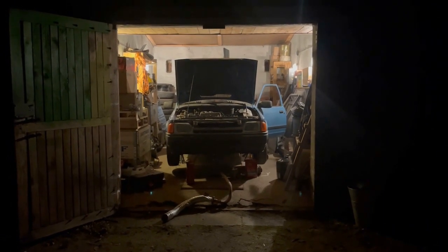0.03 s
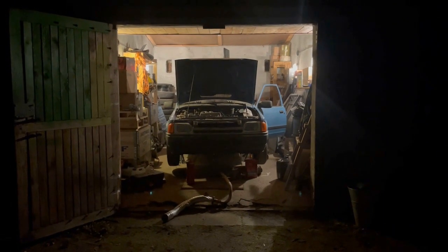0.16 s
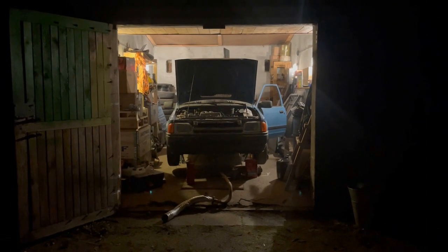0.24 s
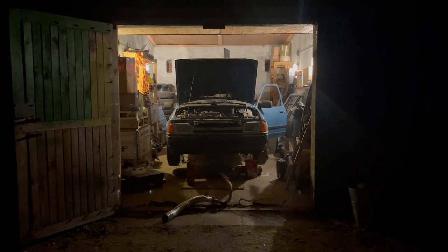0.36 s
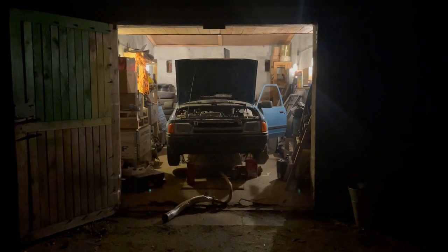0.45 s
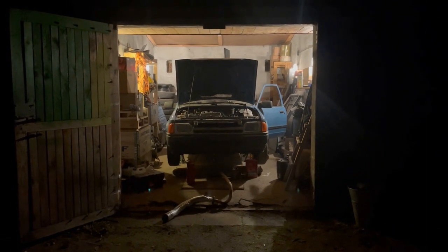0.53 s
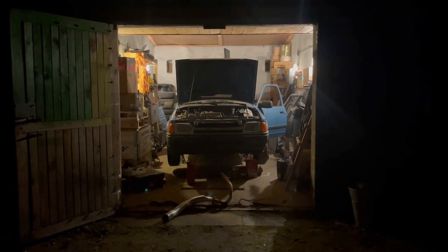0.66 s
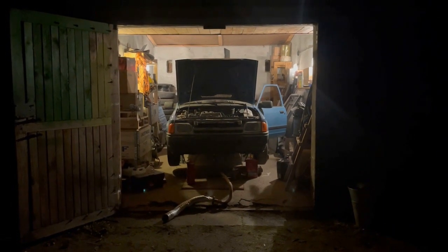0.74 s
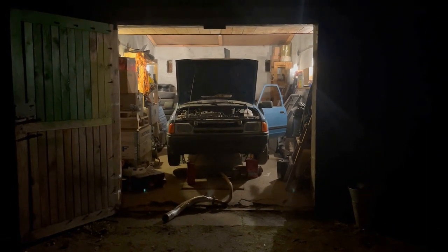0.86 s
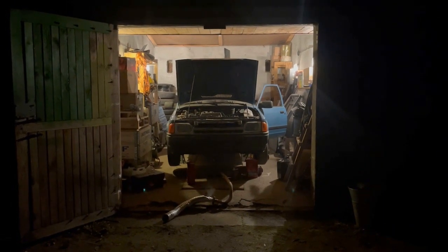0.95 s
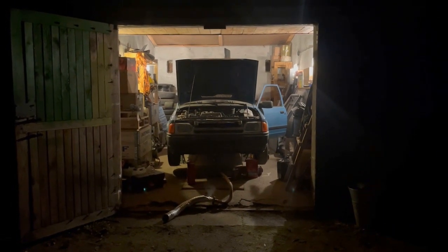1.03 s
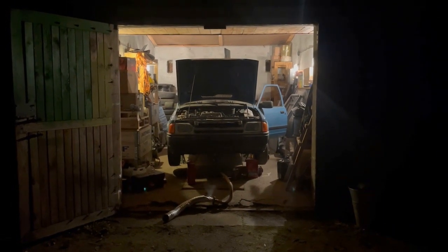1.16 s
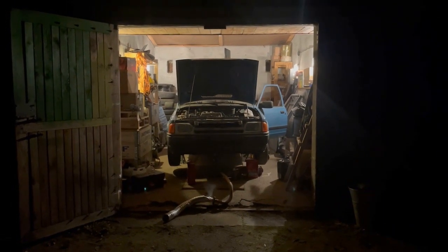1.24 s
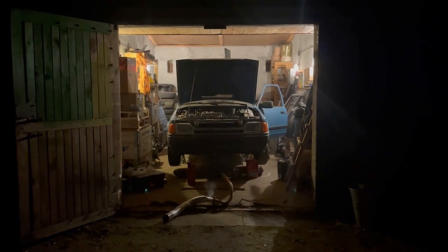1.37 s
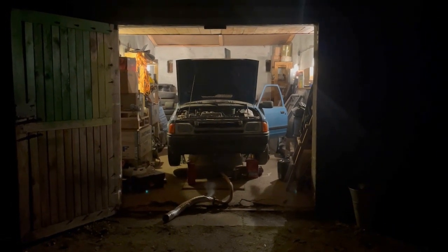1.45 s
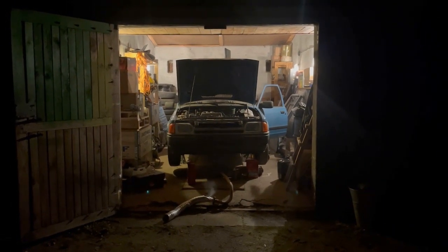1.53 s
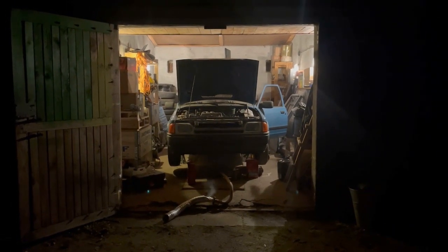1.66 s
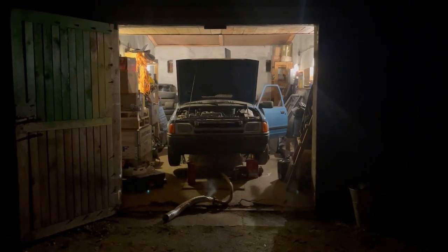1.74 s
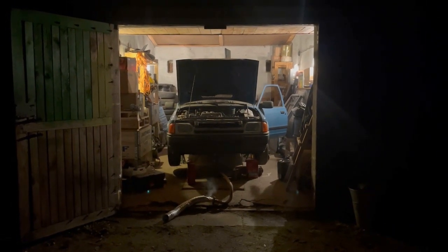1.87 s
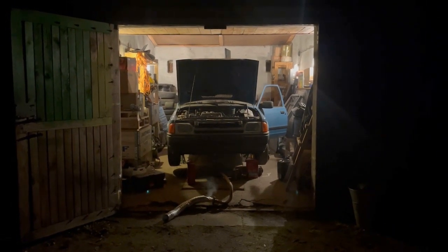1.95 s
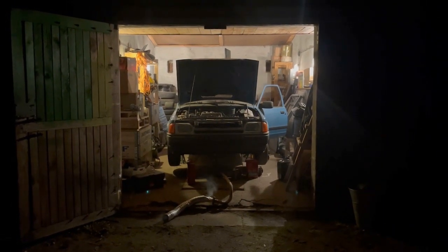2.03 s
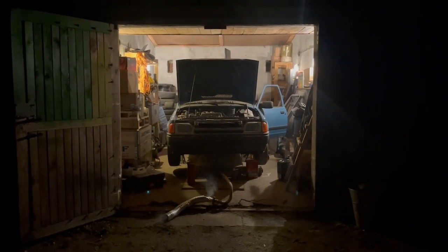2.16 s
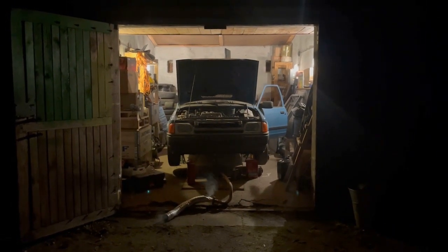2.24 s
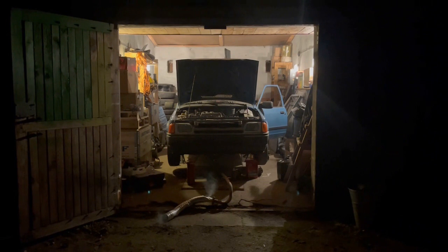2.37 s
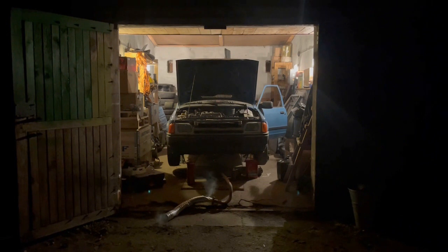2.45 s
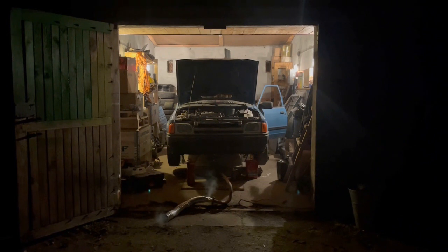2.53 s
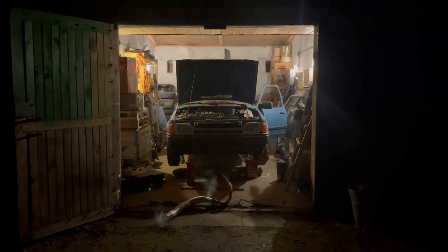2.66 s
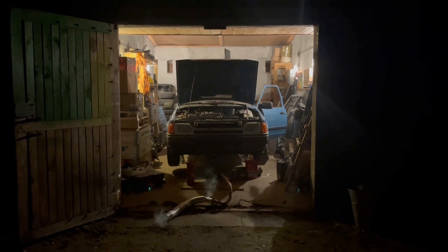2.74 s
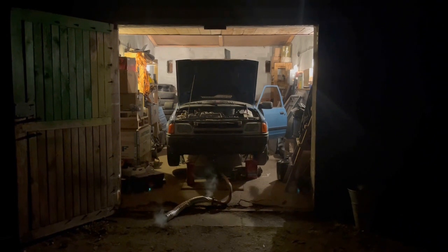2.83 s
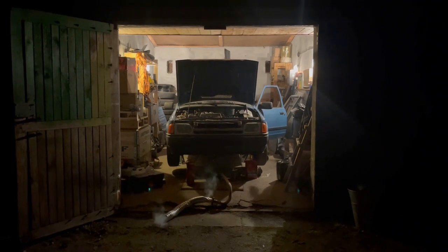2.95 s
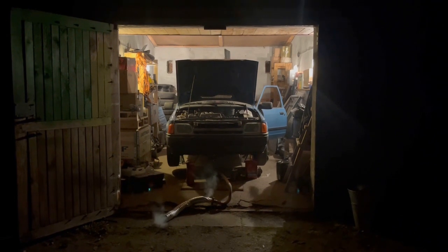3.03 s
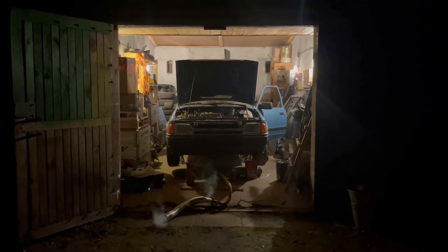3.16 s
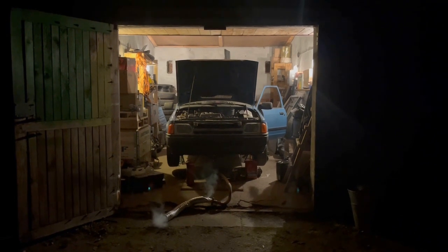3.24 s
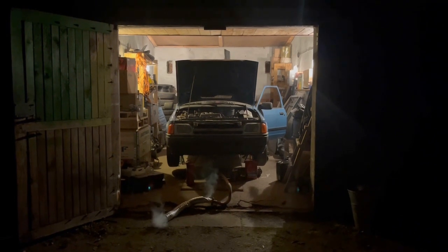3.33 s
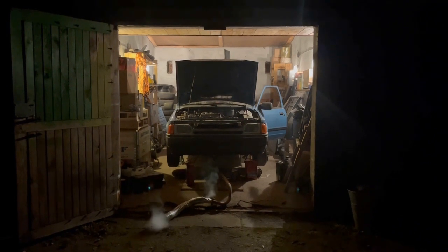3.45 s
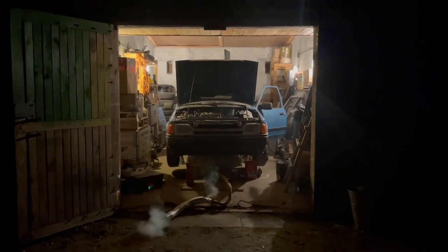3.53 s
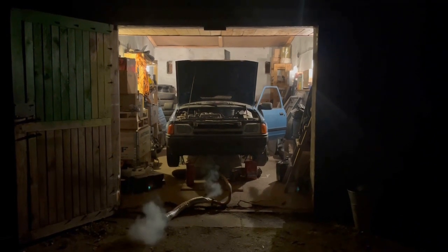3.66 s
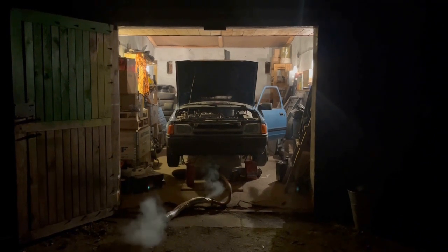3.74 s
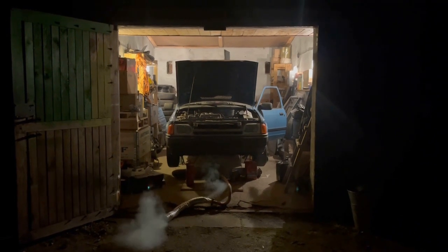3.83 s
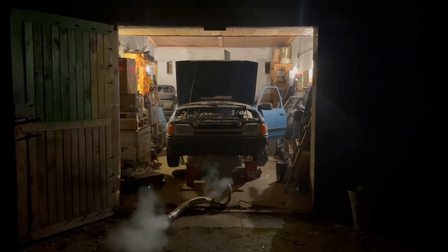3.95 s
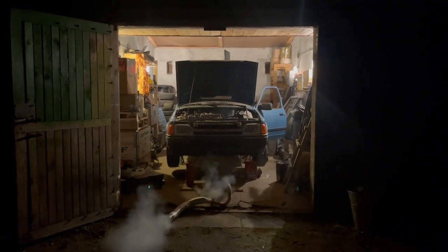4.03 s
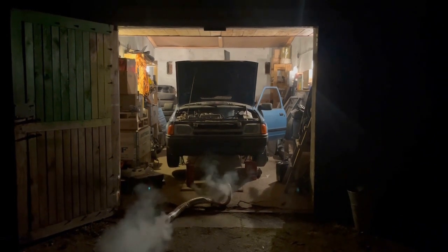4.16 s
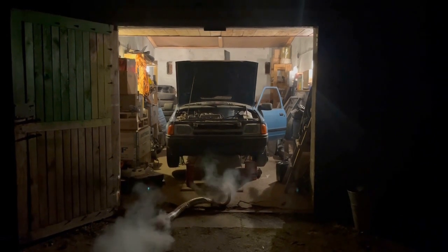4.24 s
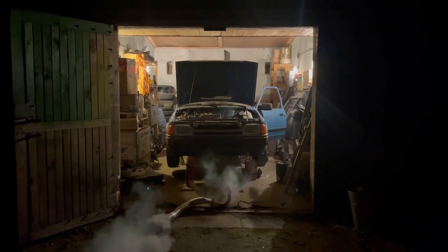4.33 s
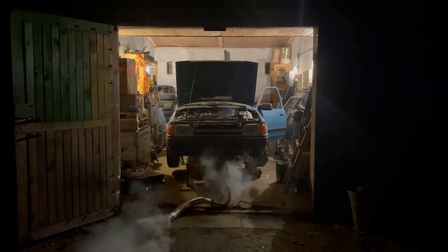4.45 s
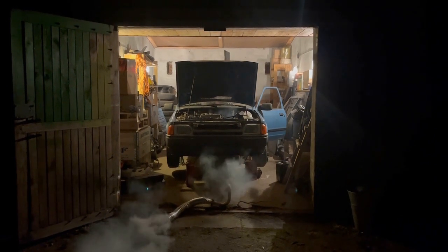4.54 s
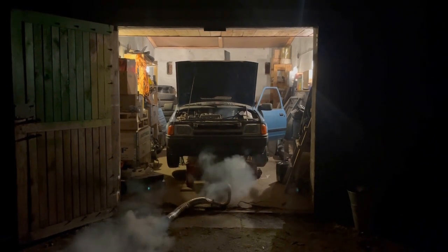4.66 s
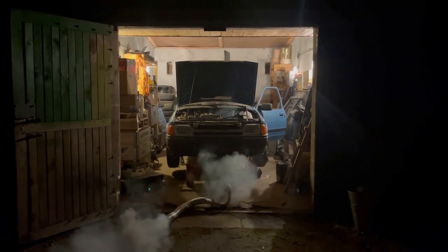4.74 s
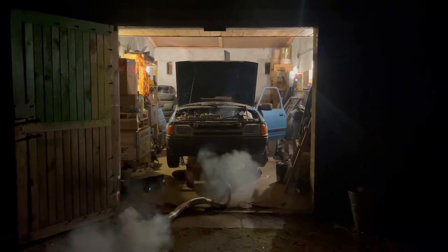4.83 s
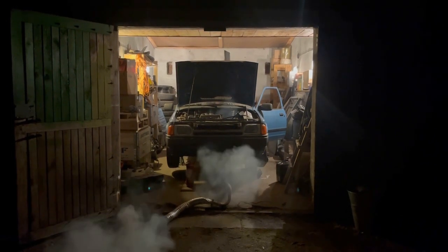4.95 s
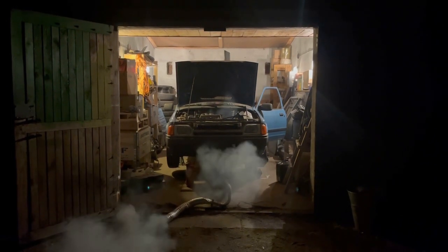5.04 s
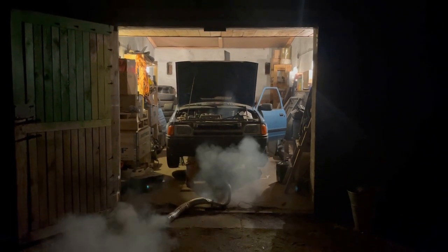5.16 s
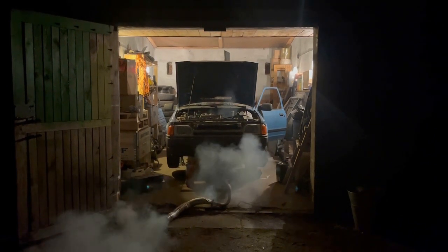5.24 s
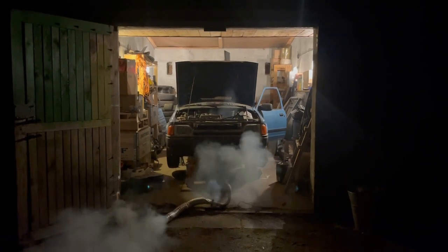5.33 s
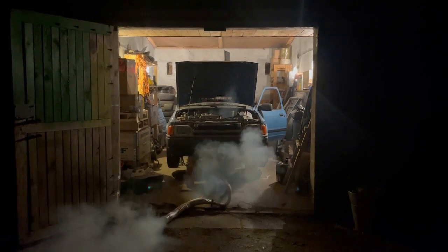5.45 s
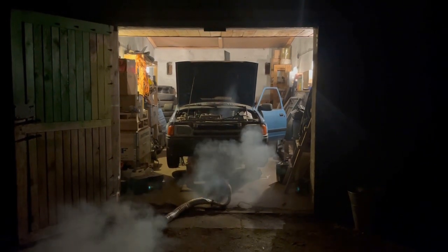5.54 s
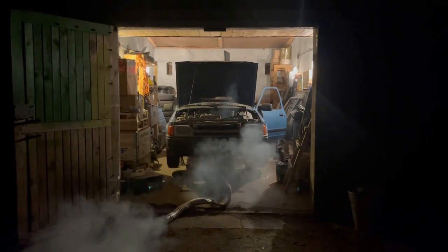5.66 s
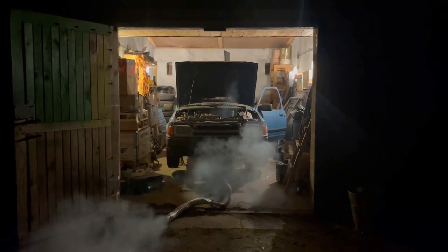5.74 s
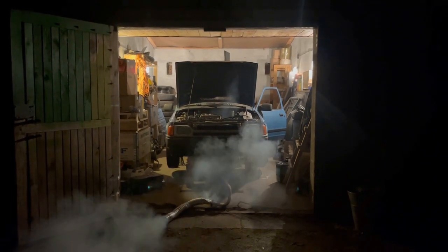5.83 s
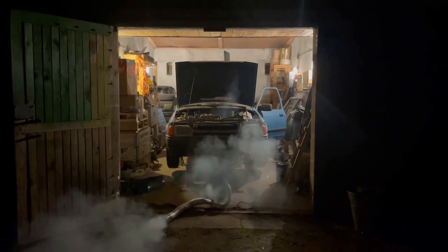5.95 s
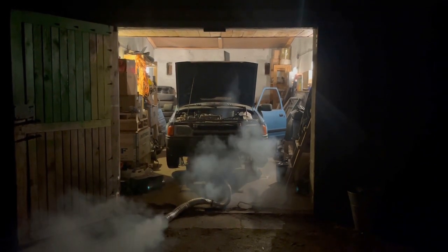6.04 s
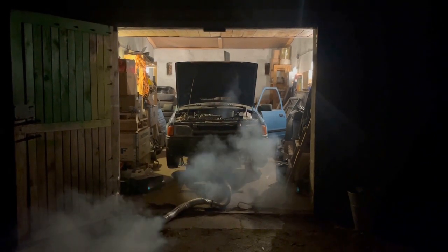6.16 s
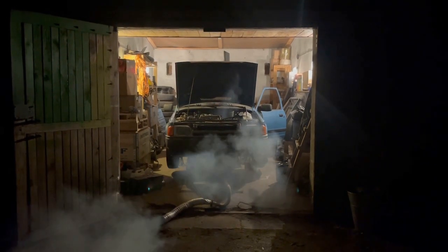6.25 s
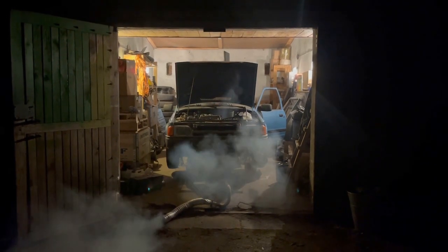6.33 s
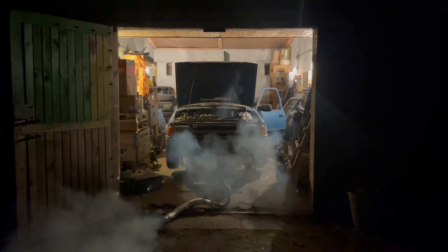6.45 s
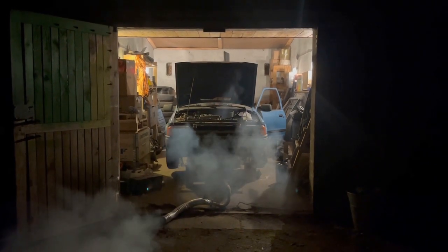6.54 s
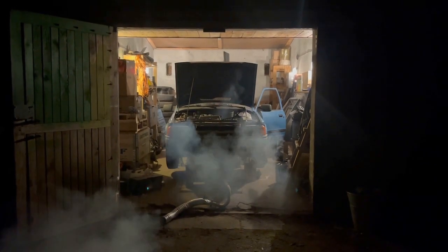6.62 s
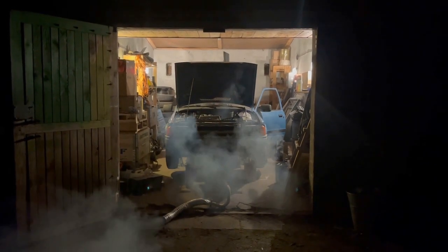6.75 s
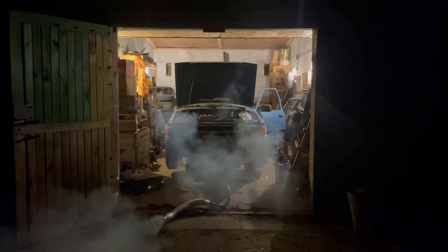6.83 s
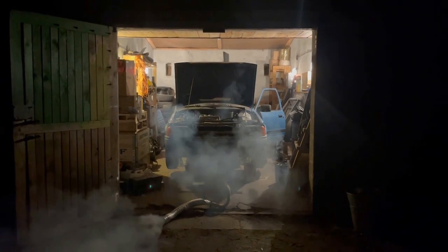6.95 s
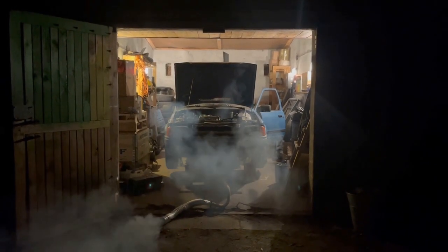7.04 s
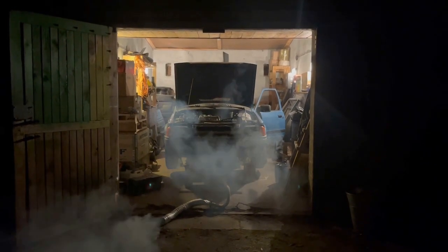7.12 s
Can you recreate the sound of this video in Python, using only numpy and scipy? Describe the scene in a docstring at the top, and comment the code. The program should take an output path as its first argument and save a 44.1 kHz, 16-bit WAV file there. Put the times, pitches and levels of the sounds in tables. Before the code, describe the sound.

A starter grinds a diesel engine over until it catches, then the engine runs roughly in knocking surges inside a garage.

```python
"""A diesel engine starts in a garage

A long-idle four-cylinder diesel is heard from outside the open door. The starter's gears grind
through twenty compression strokes, each a piston squeezing air. Then the engine catches and races.
Its governor, which controls the fuel, keeps overshooting: bursts of hard knocking from burning
fuel alternate with soft coasts in which the exhaust pipe booms."""
import sys
import numpy as np
from scipy import signal
from scipy.fft import rfft, irfft, next_fast_len
from scipy.io import wavfile
from scipy.ndimage import uniform_filter1d, minimum_filter1d

SR = 44100
rng = np.random.default_rng(int(sys.argv[2]) if len(sys.argv) > 2 else 0)


def waveform_to_disk(signal):
    """Save audio, clipped to [-1, 1], as 16-bit WAV at the path in sys.argv[1]."""
    frames = np.transpose(np.atleast_2d(signal))
    scaled = np.clip(frames, -1, 1) * 32767
    samples = np.round(scaled).astype(np.int16)
    wavfile.write(sys.argv[1], SR, samples)


N = 317079
TIME = np.arange(N) / SR

# Surges of fuel let in by the governor, and how strongly they burn:
# (start [s], length [s], level just before [dB], level on opening [dB], level on shutting [dB])
SURGES = [(4.543, 0.34, -33.5, -16.5, -19), (5.228, .22, -39, -19.5, -22), (5.756, 0.18, -48.5, -19, -27.5),
          (6.063, .19, -30, -21, -21), (6.62, 0.17, -36.5, -18.5, -22.5)]


def amp(db):
    """Turns decibels into a factor to multiply by."""
    return 10 ** (np.asarray(db) / 20)


def unit(x):
    """Scales a signal to an average (rms) size of one."""
    return x / np.sqrt(np.mean(x ** 2) + 1e-20)


def curves(table, at=TIME):
    """Joins a table's rows with straight lines: one curve for each column after the first."""
    key, *columns = np.transpose(table)
    return [np.interp(at, key, column) for column in columns]


def spectrum(table, hz):
    """Like curves, but along frequency, with every octave equally wide."""
    key, *columns = np.transpose(table)
    return [np.interp(np.log(hz + 1), np.log(key + 1), column) for column in columns]


def convolve(x, response):
    """Lets every sample of x set off its own copy of a response."""
    return signal.oaconvolve(x, response)[:N]


def colour(x, points, size=4096):
    """Shapes the tone by (frequency [Hz], relative level [dB]) points; white noise keeps its power."""
    hz = abs(np.fft.fftfreq(size, 1 / SR))
    log_gain = np.log(amp(np.maximum(spectrum(points, hz)[0], -100)))
    response = np.exp(np.conj(signal.hilbert(log_gain)))  # nothing sounds ahead of its cause
    taps = np.fft.ifft(response).real[:size // 2]
    return convolve(x, taps / np.linalg.norm(taps))


def resonate(x, hz, width):
    """A resonance: passes a band around one frequency and weakens the rest."""
    return signal.lfilter(*signal.iirpeak(hz, hz / width, SR), x)


def noise():
    """White noise, an even hiss."""
    return rng.standard_normal(N)


def noise_band(hz, width):
    """Noise gathered around one frequency."""
    return unit(resonate(resonate(noise(), hz, width), hz, width))


def waver(per_s):
    """A smooth random wobble, up to about per_s times a second."""
    return unit(irfft(rfft(noise()) * np.exp(-(np.fft.rfftfreq(N, 1 / SR) / per_s) ** 2), N))


def ring(modes, detune=0., size=8192):
    """The fading tones of something struck; detune shifts each pitch at random."""
    t = np.arange(size) / SR
    tones = np.zeros(size)
    for hz, fade_s, db in modes:
        pitch = hz * (1 + detune * rng.standard_normal())
        tones += amp(db - 60 * t / fade_s) * np.sin(2 * np.pi * pitch * t)
    return tones


def garage(x, wet_db, size=20000):
    """The direct sound plus wall echoes at a level of wet_db, reaching two close microphone openings."""
    # How long the echoes last: (frequency [Hz], time to fade by 60 dB [s])
    echo_times = [(100, 0.54), (500, 0.23), (2000, 0.28), (6000, 0.36), (15000, 0.21)]
    # The two openings: (frequency [Hz], likeness of their echoes [0-1], left minus right [dB])
    openings = [(91, 0.71, 6.5), (302, 0.9, -1), (664, 0, 4.5), (1260, 0, 6), (2360, 0, 1), (3930, 0, 5.5),
                (8400, 0, 0), (15000, 0.8, 0)]
    hz, t, bands = signal.stft(rng.standard_normal((2, size)), SR, nperseg=256)
    fade = amp(-60 * t / spectrum(echo_times, hz)[0][:, None])
    echoes = signal.istft(bands * fade, SR, nperseg=256)[1]
    echoes *= np.minimum(np.arange(echoes.shape[1]) / SR / .004, 1)
    echoes *= amp(wet_db) / np.linalg.norm(echoes, axis=1, keepdims=True)
    length = next_fast_len(N + size)
    hz = np.fft.rfftfreq(length, 1 / SR)
    same, balance_db = spectrum(openings, hz)
    shared, apart = rfft(echoes, length) * np.sqrt([(1 + same) / 2, (1 - same) / 2])
    lead = np.exp(2j * np.pi * hz * 9e-6)  # the sound reaches the left opening first
    left = (lead + shared + apart) * amp(balance_db / 2)
    right = (1 / lead + shared - apart) * amp(-balance_db / 2)
    stereo = irfft(np.array([left, right]) * rfft(x, length), length)[:, :N]
    return stereo / np.sqrt(1 + amp(wet_db) ** 2)


def strokes(count=28):
    """Counts the compression strokes the starter has pushed through, and gives each one's effort in dB."""
    # The four cylinders while the starter turns them: (lateness [s], effort [dB])
    compression = [(.004, -3.5), (-.002, -3), (-.001, -3.5), (-0.0051, -2.8)]
    first_s, stroke_s, loosen_s = .0145, .17285, .000192  # strokes shorten as the oil loosens
    k = np.arange(-1, count)
    late_s, effort_db = np.array(compression)[k % len(compression)].T
    starts = first_s + k * (stroke_s - k * loosen_s / 2) + late_s
    stroke = np.interp(TIME, starts, k + 1)
    return stroke, effort_db[stroke.astype(int)]


def starter():
    """A small gear grinds on the engine's big one, slows at each squeeze and whines back up to speed."""
    # One stroke: (position [0-1], tooth rate [Hz], load on the teeth [dB], scrape [dB], whine [dB])
    one_stroke = [(0, 405.8, -9, -1, -13), (.04, 398.6, -1.5, -4, 6), (.16, 384.7, -2, -5, -8),
                  (.33, 301.9, -1.5, -37, 0), (.42, 285, -2.5, -32, -27), (.54, 314.5, -8.5, -10, 3),
                  (.7, 343.2, -12, -9, 0), (.84, 381.3, -18.5, -12, -2), (.97, 404.1, -13, -5, 6.5),
                  (1, 405.7, -16, 11, -18)]
    # How hard the starter drives the engine: (time [s], level [dB])
    drive = [(0, 3.5), (3.4, 3.5), (3.55, -5), (3.7, 0.5), (4.1, -58)]
    # Ringing of the metal housing around the gears: (frequency [Hz], width [Hz], level [dB])
    housing_tones = [(289, 71, 5.5), (427, 33, 1), (535.3, 24, 6.5), (858, 22, 4), (1100, 82, -23),
                     (1192, 48, -4), (1270, 23, -37), (1993, 46, -12)]
    # Tone of the grinding: (frequency [Hz], level [dB])
    grind_tone = [(60, -75), (110, -17.5), (175, -4), (220, -22), (330, -2), (470, -18), (700, -9),
                  (1250, -5.5), (1600, -9.5), (2300, -10.5), (3000, -17.5), (4500, -26), (8000, -34),
                  (15000, -41)]
    # Tone of the scraping: (frequency [Hz], level [dB])
    scrape_tone = [(1500, -7), (3000, -48), (5000, 22), (6200, 18.5), (7500, 6), (11000, 14), (14000, -9),
                   (16000, -68)]
    whine_cycles_per_tooth = 7.8
    stroke, effort_db = strokes()
    tooth_hz, load_db, scrape_db, whine_db = curves(one_stroke, stroke % 1)
    effort = amp(effort_db + curves(drive)[0])
    teeth = np.cumsum(tooth_hz * (1 + .008 * waver(12) + .004 * waver(150))) / SR
    impacts = unit((2 + np.exp(-(teeth % 1) / .81)) * noise() * amp(2 * waver(180)))  # one blow a tooth
    buzz = unit(sum(np.cos(2 * np.pi * k * teeth) * (1 + waver(72)) for k in range(1, 8)))
    pressed = effort * amp(1.53 * load_db) * (buzz + 1.6 * impacts)  # the housing rings under load
    housing = amp(-26.5) * sum(amp(db) * resonate(pressed, hz, width) for hz, width, db in housing_tones)
    squeeze = amp(1.5 - 10 * (stroke % 1))  # the scrape starts sharply with each stroke
    grind = amp(-32.5) * colour(effort * amp(load_db) * impacts, grind_tone)
    scrape = amp(-44.5) * colour(effort * amp(scrape_db) * squeeze * noise(), scrape_tone)
    flutter = amp(2.4 * waver(70))
    motor_tone = np.sin(2 * np.pi * whine_cycles_per_tooth * teeth + .8 * waver(300))
    whine = effort * amp(-49 + whine_db) * flutter * motor_tone
    pipe_air = unit(resonate(resonate(noise(), 66.5, 22), 62, 36))  # unburnt air in the exhaust
    puffs = pipe_air * effort * amp(-40 + .71 * load_db)
    return garage(housing + grind + scrape, wet_db=-5) + garage(whine, wet_db=-10) + puffs


def overrun():
    """A thin, flickering hiss as the engine catches, probably the starter being dragged along."""
    # Swell of the hiss: (time [s], level [dB])
    swell = [(3.38, -100), (3.45, -55), (3.7, -47), (3.95, -50), (4.12, -60), (4.25, -100)]
    level = amp(curves(swell)[0] + 2 * waver(60))
    return garage(level * noise_band(hz=12300, width=13000), wet_db=-11)


def crankshaft():
    """The turning main shaft sets the firings per second and the count of firings so far."""
    # Engine speed, a run-up and then five swings: (time [s], firing rate [Hz])
    speed = [(3.41, 14), (3.57, 17.1), (3.72, 21), (3.86, 29.9), (3.98, 41.1), (4.08, 57.1), (4.19, 67.2),
             (4.543, 42.5), (4.89, 75.6), (5.228, 55.8), (5.51, 74.1), (5.756, 51.9), (5.91, 64.9),
             (6.063, 69), (6.26, 86.3), (6.6, 72.5), (6.785, 106), (7.19, 66)]
    rate = np.interp(TIME, *np.transpose(speed), left=0)
    fired = np.cumsum(rate) / SR
    for start, *_ in SURGES:  # nudge the count so that each surge begins on a firing
        so_far = np.interp(start, TIME, fired)
        fired += (np.round(so_far) - so_far) * np.interp(TIME, [start - .12, start], [0, 1])
    return rate, fired


def combustion():
    """How strongly the fuel burns, in dB: the engine catches, then surges and coasts by turns."""
    # Burning as the engine catches and runs up: (time [s], level [dB])
    catch = [(3.41, -23), (3.6, -18), (3.655, -14), (3.85, -13.5), (4.15, -18.5)]
    lead_in_s, open_s, shut_s = .033, .0044, .02  # fuel comes on around a surge's start and is cut fast
    coast_db, final_db = -36, -50.5
    points = list(catch) + [(catch[-1][0] + shut_s, coast_db)]
    for start, length, before_db, first_db, last_db in SURGES:
        points += [(start - lead_in_s, before_db), (start + open_s, first_db)]
        points += [(start + length, last_db), (start + length + shut_s, coast_db)]
    return curves(points + [(N / SR, final_db)])[0]


def firings(rate, fired):
    """Each firing cracks against the engine block, and a puff rings the exhaust just after it."""
    # Single firings that stand out: (time [s], strength of burning [dB])
    lone_knocks = [(3.539, -15.5), (3.999, -11), (4.095, -16), (4.352, -30), (4.419, -31), (4.565, -13.5),
                   (4.588, -15.5), (4.609, -17), (4.649, -14), (4.783, -21.5), (5.187, -26.5), (5.227, -18),
                   (5.281, -15.5), (5.377, -14), (5.421, -12.5), (5.776, -19), (6.035, -25.5),
                   (6.063, -18.5), (6.133, -18)]
    # The four unequal cylinders, in firing order: (level [dB])
    cylinders = [0.68, -1.4, 0.088, -1.2]
    # Tone of the crack: (frequency [Hz], level [dB])
    crack_tone = [(140, -19.5), (230, -18.5), (357, 0.5), (526, -16.5), (803, -7.5), (909, -17),
                  (1070, -10.5), (1570, -24), (1940, -14.5), (3120, -22.5), (6090, -30), (8370, -41.5),
                  (9460, -35.5), (11700, -39), (15500, -55.5)]
    # Ringing of the engine block: (frequency [Hz], time to fade by 60 dB [s], level [dB])
    block_tones = [(355, 0.019, 9.5), (365, 0.012, -10), (780, 0.048, -3), (1129, 0.044, -1.5),
                   (1237, 0.036, -0.5), (1847, 0.037, -11), (1908, 0.02, 5), (2540, 0.046, -11),
                   (2713, 0.054, -14), (3630, 0.032, -11.5), (4270, 0.012, -3), (6400, 0.0052, -13)]
    # Ringing of the exhaust and the garage air: (frequency [Hz], time to fade by 60 dB [s], level [dB])
    pipe_tones = [(56, 0.44, -4.5), (78.5, 0.15, 3.5), (115.3, 0.42, -7), (171, 0.38, -11), (276, 0.04, -8)]
    puff_delay_s = .0062
    at = np.flatnonzero(np.diff(np.ceil(fired), prepend=0) > 0)  # the sample where each firing starts
    burn_db = combustion()[at]
    for time, db in lone_knocks:
        nearest = np.argmin(abs(at / SR - time))
        at[nearest], burn_db[nearest] = round(time * SR), db
    knock = amp(burn_db) / (1 + amp(-2 * (burn_db + 39)))  # with the fuel cut, the knock dies away
    chance = rng.standard_normal((len(at), 2 + len(block_tones)))
    t = np.arange(4096) / SR
    decay = (np.exp(-t / .0033) + .14 * np.exp(-t / .018)) * (1 - np.exp(-t / .0005))
    block, puffs = np.zeros((2, N))
    cracks = np.zeros((2, N))
    for k, cylinder_db in enumerate(cylinders):
        own = slice(k, None, len(cylinders))
        blows, pushes = np.zeros((2, N))
        # with speed the cracks grow harder and the puffs gentler
        blows[at[own]] = knock[own] * amp(cylinder_db + 2 * chance[own, 0]) * (rate[at[own]] / 55) ** .22
        push_db = -5 + .83 * burn_db[own] + cylinder_db + 3.3 * chance[own, 1]
        pushes[at[own]] = amp(push_db) * (rate[at[own]] / 20) ** -.8
        # each cylinder has its own clack and echoes; fresh noise makes every crack differ
        clack = convolve(blows, decay * rng.standard_normal(len(t)))
        crack = .5 * clack + .74 * convolve(blows, decay) * noise()
        cracks += garage(amp(5.5) * colour(crack, crack_tone), wet_db=-3)
        puff = np.pad(ring(pipe_tones, detune=.093), (round(puff_delay_s * SR), 0))
        puffs += convolve(pushes, puff)
    for tone, luck in zip(block_tones, chance.T[2:]):  # uneven burning rings each tone differently
        blows = np.zeros(N)
        blows[at] = knock * luck * (rate[at] / 55) ** -.15
        block += convolve(blows, ring([tone]))
    return cracks + garage(amp(-7.5) * block, wet_db=-2) + puffs


def exhaust(rate, fired):
    """Gas pulses boom in the pipe and bark under fuel; unequal cylinders add a drone."""
    # Boom at 1, 2 and 3 times the firing rate: (level at full fuel [dB], loss per dB less burn [dB])
    boom_tones = [(-2, 0.44), (1, 1.36), (0.5, 0.75)]
    # What the pipe lets through of the boom: (frequency [Hz], level [dB])
    pipe = [(40, -52), (50, -38), (57, -34), (64, -24.5), (76, -16.5), (88, -20.5), (104, -22), (135, -26),
            (152, -28), (175, -24), (215, -39), (260, -33), (310, -28)]
    # What the silencer lets through of the bark: (frequency [Hz], level [dB])
    silencer = [(150, -11), (215, -7), (255, -4.5), (320, 1), (370, -4), (415, 4.5), (470, -38), (560, -11),
                (700, -17.5)]
    # Tones of the drone: (frequency [multiple of the shaft's speed], level [dB])
    drone_tones = [(1, -32), (2, 0), (3, 7.5), (4, 8.5), (5, -3), (6, -9), (7, -11), (8, -1), (9, -13),
                   (10, -6), (11, -31), (12, -28.5), (13, -8), (14, -71)]
    full_burn_db, lag_s = -24, .026  # the boom is full from this burn upward, and outlasts it a little
    burn_db = combustion()
    hold = np.exp(-1 / (lag_s * SR))
    lagging_burn = signal.lfilter([1 - hold], [1, -hold], amp(burn_db))
    starved_db = np.maximum(full_burn_db - 20 * np.log10(lagging_burn), 0)
    boom, bark, drone = np.zeros((3, N))
    for k, (db, loss) in enumerate(boom_tones, 1):
        level_db = db + spectrum(pipe, k * rate)[0] - loss * starved_db + 2.5 * waver(14)
        boom += amp(level_db) * np.sin(2 * np.pi * k * fired)
    boom *= np.sqrt(2) * np.clip((rate - 17) / 7, 0, 1)  # fades in as the engine gathers speed
    for k in range(4, 15):
        level_db = spectrum(silencer, k * rate)[0] + 3.9 * waver(28)
        bark += amp(level_db) * np.sin(2 * np.pi * (k * fired + rng.random()))
    bark *= amp(-18 + .6 * burn_db) * (rate / 80) ** 2
    shaft_turns = fired / 2
    for k, db in drone_tones:
        if k > 2:
            drone += amp(db + 3.5 * waver(8)) * np.sin(2 * np.pi * (k * shaft_turns + rng.random()))
    drone = amp(-33.5 - .26 * starved_db) * unit(drone) * (rate / 80) ** .5
    return boom + bark + drone


def gas_flow(rate, fired):
    """Swirling gas, chopped by the valves, hisses at racing speed and rumbles in the pipe."""
    # Tone of the hiss: (frequency [Hz], level [dB])
    hiss_tone = [(300, -20), (700, -1), (1500, 9.5), (2000, 16.5), (3000, 1), (4500, 8.5), (6000, 0),
                 (8000, -21), (12000, -31), (16000, -29)]
    burn_db = combustion()
    chopped = unit((.45 + np.exp(-(fired % 1) / .42)) * noise())
    hiss = amp(-12.5 + burn_db) * (rate / 90) ** 2 * colour(chopped, hiss_tone)
    pipe = resonate(chopped, 140, 63) + .38 * resonate(chopped, 120, 56)
    pipe += .11 * resonate(chopped, 253, 133)
    rumble = signal.sosfilt(signal.butter(4, [70, 430], "band", fs=SR, output="sos"), unit(pipe))
    rumble *= amp(-14.5 + .5 * burn_db) * np.clip((rate - 15) / 15, 0, 1)
    return garage(hiss, wet_db=-6) + rumble


def valve_gear(rate, fired):
    """The valve lifters and the pump chatter twice per firing, slightly louder with speed."""
    # Tone of the chatter: (frequency [Hz], level [dB])
    chatter_tone = [(110, -4), (180, 5), (260, -7), (370, 2), (480, -18.5), (700, -8.5), (1100, -12),
                    (1500, -11.5), (2000, -13), (3200, -17.5), (5000, -25.5), (8000, -27), (11000, -28.5),
                    (15500, -40)]
    chatter = unit((2 + np.exp(-(2 * fired % 1) / .047)) * amp(2 * waver(107)) * noise())
    return garage(amp(-37.5) * (rate / 70) ** .035 * colour(chatter, chatter_tone), wet_db=2.5)


def rustle():
    """A dry rustle that now and then swells and dies away faster than it came."""
    # The swells: (time of peak [s], level [dB], centre frequency [Hz])
    swells = [(3.93, -29.5, 2670), (4.42, -47, 2160), (6.691, -26.5, 2550), (7.22, -33.5, 2270)]
    rise_db_per_s, fall_db_per_s = 110, 170
    sound = np.zeros(N)
    for peak_s, db, hz in swells:
        fade_db = np.maximum((peak_s - TIME) * rise_db_per_s, (TIME - peak_s) * fall_db_per_s)
        sound += amp(db - fade_db) * noise_band(hz, width=850)
    return garage(sound, wet_db=-1.5)


def scene():
    """The starter and the running engine, added together in stereo."""
    rate, fired = crankshaft()
    starting = starter() + overrun()
    running = firings(rate, fired) + exhaust(rate, fired) + gas_flow(rate, fired)
    return starting + running + valve_gear(rate, fired) + rustle()


def record(dry):
    """The microphone loses deep bass, a band of treble and the very top; a limiter holds peaks down."""
    bass_hz, top_hz, peak_limit = 46, 15600, .5
    x = signal.sosfilt(signal.butter(6, bass_hz, "high", fs=SR, output="sos"), dry)
    x = x - .95 * resonate(x, hz=8300, width=2000)
    allowed_gain = np.minimum(1, peak_limit / (abs(x).max(0) + 1e-9))
    x = x * uniform_filter1d(minimum_filter1d(allowed_gain, size=180), size=180)
    top_cut = signal.firwin(511, top_hz, window=("kaiser", 9), fs=SR)
    return signal.oaconvolve(x, top_cut[None], "same")


dry = scene()
out = record(dry)
waveform_to_disk(out)
```